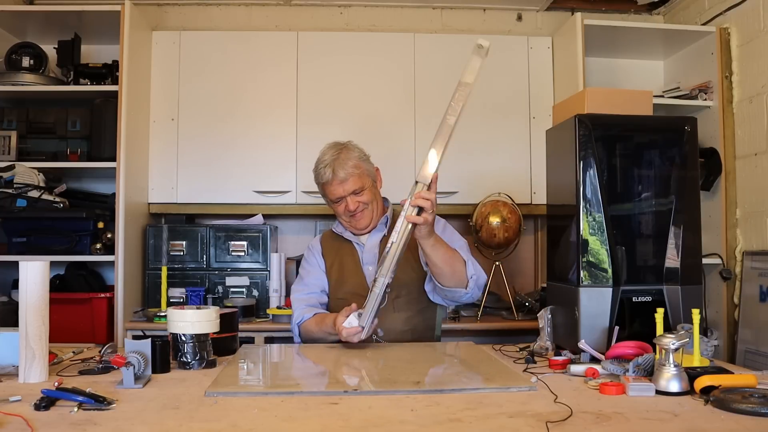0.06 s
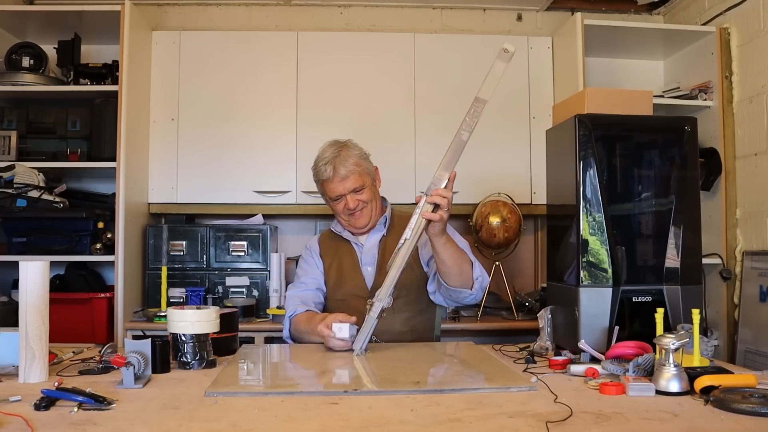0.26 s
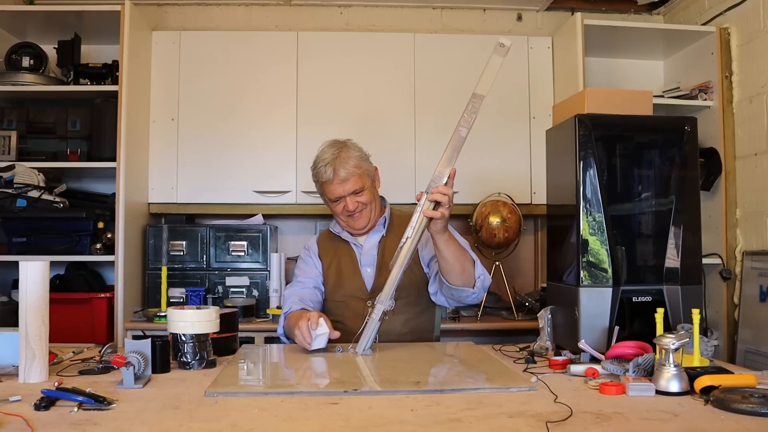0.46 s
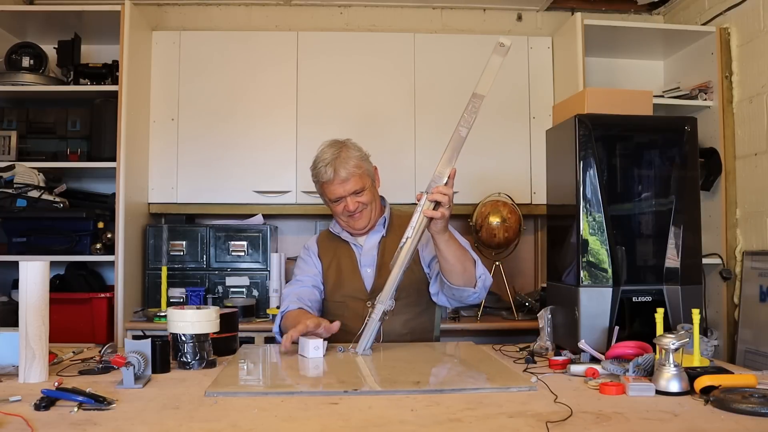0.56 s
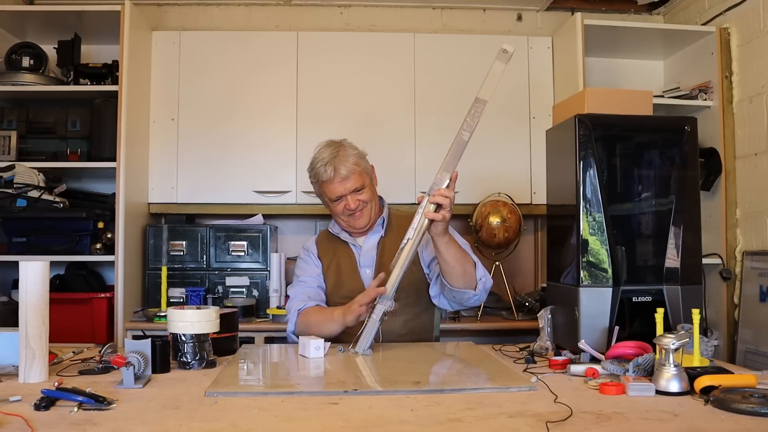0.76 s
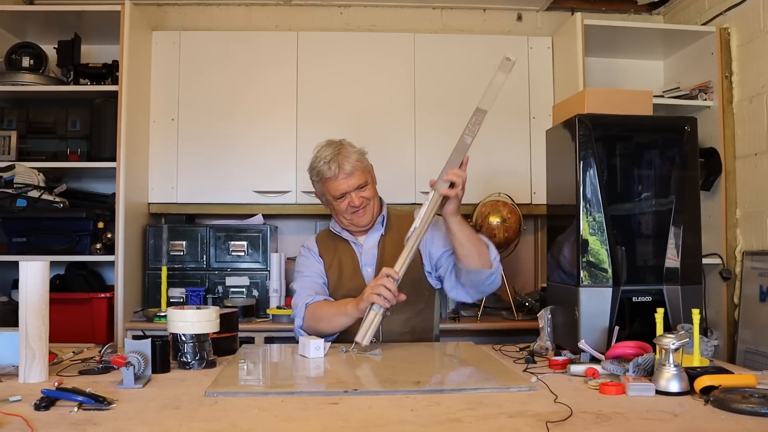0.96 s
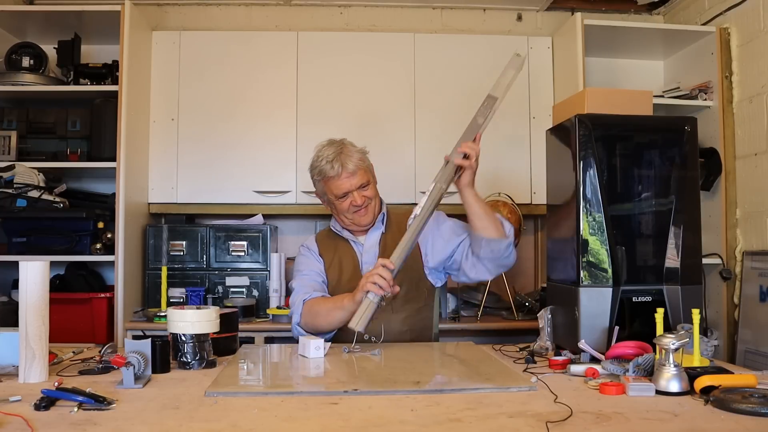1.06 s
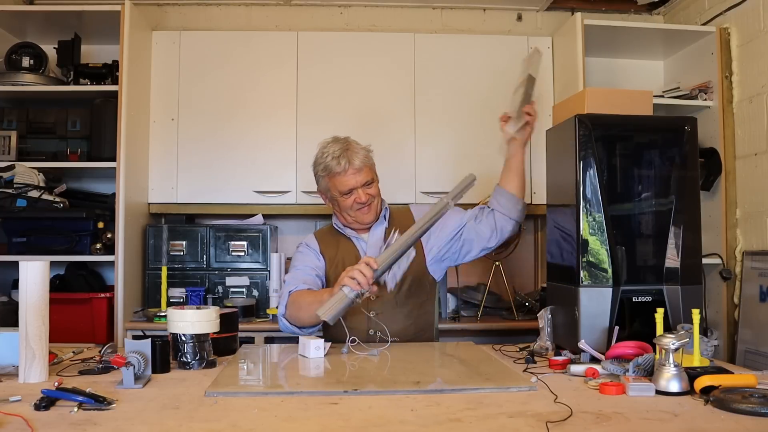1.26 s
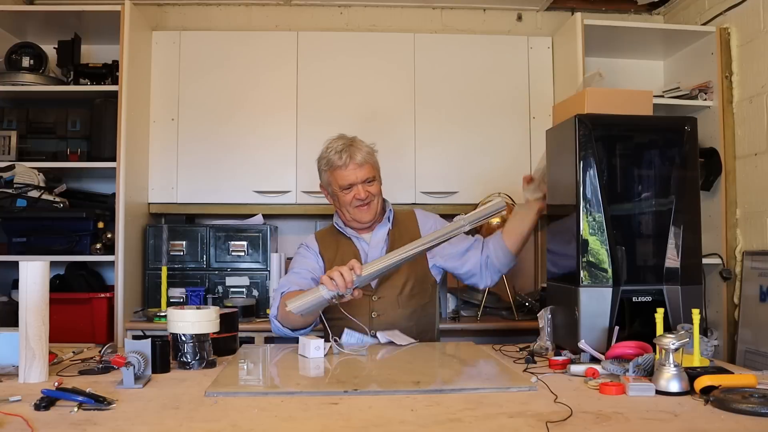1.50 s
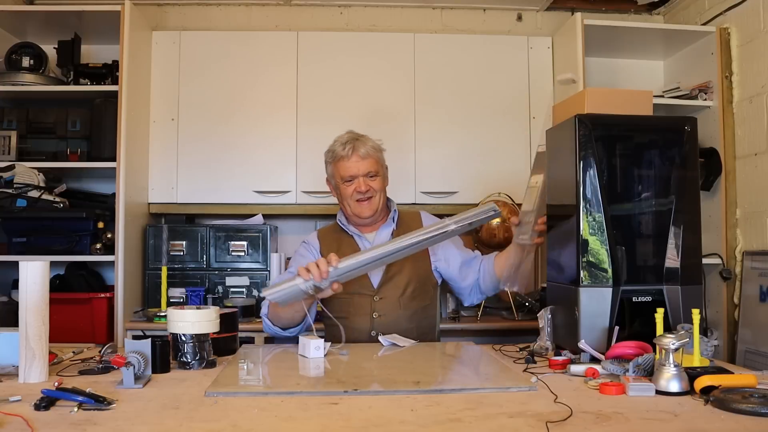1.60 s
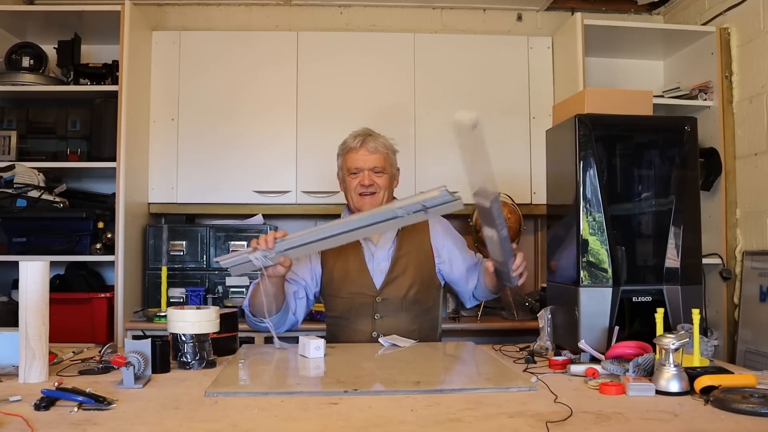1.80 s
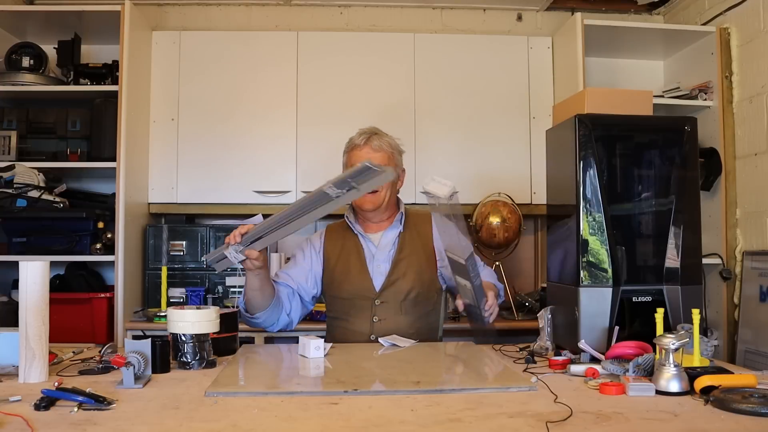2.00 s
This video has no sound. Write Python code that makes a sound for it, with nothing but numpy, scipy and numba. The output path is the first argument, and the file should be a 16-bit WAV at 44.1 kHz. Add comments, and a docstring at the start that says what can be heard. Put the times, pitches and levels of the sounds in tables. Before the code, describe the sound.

Plastic slats clatter over a workbench: a sharp clack with a bright metallic ting at 0 s, then dense clicks and rustling from 0.3 to 0.8 s, with a box thudding down near 0.5 and a brief sliding hum. A lull follows. Hollow knocks and a short scrape come at 1.05-1.3 s, a loud cabinet knock at 1.53, then light rattles and soft bumps until 2 s. Small hard room, peaks clipped.

```python
"""Plastic blind slats, handled as a bundle over a workbench, clack in quick volleys of short ringing contacts.
The place is a small hard-walled workshop with a short noise tail; a faint noise bed is its quiet air.
Many tiny grains make the bundle rustle, damped modes its hollow knocks, the thuds on bench and cabinet
and the tings of a small metal fitting that faces the microphone. Random slips drive resonances where one
slat slides on the bench and one scrapes out along its neighbour. The microphone clips on the loudest peaks."""
import sys
import numpy as np
from scipy import signal
from scipy.fft import rfft, irfft
from scipy.io import wavfile
from numba import njit

SR = 44100
rng = np.random.default_rng(int(sys.argv[2]) if len(sys.argv) > 2 else 0)


def wav_out(sig):
    """Save sig, one row per channel (or a flat mono array), as 16-bit PCM at SR to the path in sys.argv[1]."""
    wavfile.write(sys.argv[1], SR, np.round(np.clip(np.atleast_2d(sig).T, -1, 1) * 32767).astype(np.int16))


def level_to_linear(level):
    """Convert decibel levels to linear amplitude factors, elementwise."""
    exponent = np.asarray(level, float) / 20
    return 10 ** exponent


N = 90272  # samples

# Slats clacking. Each row: start in seconds, relative level in dB, centre pitch in Hz,
# time scale of the volley in seconds, relative level of the bright ticks in dB.
CLACK_VOLLEYS = [(0,0.5,2470,0.0035,-15), (.012,-8.5,2860,0.011,-19), (0.0927,-13.5,3900,0.0018,-18),
                 (0.238,-32,1720,0.0032,-53), (0.26,-19,2230,0.0025,-31), (0.3024,-14,2540,0.0051,-19),
                 (0.3191,-1.5,4070,.001,-27), (0.4054,-4.5,2270,0.015,-32), (0.4345,-28,5960,0.004,2),
                 (0.4395,-24.5,7000,0.0022,17.5), (0.448,-15,6600,0.005,-2), (0.4883,-3,2780,0.0036,-8),
                 (0.4953,-6,5030,0.0038,-28), (.5245,-16.5,6040,0.0087,6), (0.5306,-24,7650,0.0031,0),
                 (0.6274,-9,1650,0.0078,-2), (0.6531,-19,1550,0.0021,-22), (0.7048,-9,4770,0.0075,-18),
                 (0.7808,-8.5,2330,.006,-23), (1.0644,-15,3400,0.0077,-15), (1.2378,-19,1400,0.0018,9.5),
                 (1.2771,-7,1340,.002,1.5), (1.294,-14,1540,0.0064,3), (1.378,-19,2460,0.0048,6),
                 (1.5328,1,3640,.002,-36), (1.544,-4,2690,0.0027,-6), (1.7119,-22,2980,.005,-20),
                 (1.728,-21,5700,0.00092,-13), (1.74,-20.5,3900,0.002,-9), (1.9212,-15,4200,.0012,-30), ]
CONTACTS = 24  # per volley
CONTACT_CYCLES, CONTACT_SPREAD = 12, .24  # cycles per t60, pitch spread in log units
CONTACT_DB, TICK_DB = -8, -6

# Strikes on the metal fitting. Each row: start in seconds, relative level in dB, extra level of all modes
# but the two lowest in dB.
TING_BLOWS = [(0,-17.5,2), (.03,-33,-1), (.0925,-13.5,-18), (.6,-41,4.5), (.632,-35,0), (.7495,-26,0),
              (.761,-26,-2), (.772,-22.5,1), (.781,-24.5,-1), (.789,-25,-1), (.803,-25,-4), (.82,-29,-4),
              (1.134,-34,-13), (1.146,-24.5,-12)]
# Modes of the fitting. Each row: pitch in Hz, level in dB, t60 in seconds.
FITTING_MODES = [(5130,-5,.03), (5200,-4,.035), (8250,-8,.03), (8520,-5,.035), (10000,-10,.03),
                 (10180,-10,.025), (12880,-14,.03)]

# Rustle of the bundle. Each row: time in seconds, then relative levels in dB for low, middle, high and
# top grains.
RUSTLE_LEVELS = [(0,-24,-31.5,-14.5,-28.5), (.16,-47.5,-41,-57.5,-74), (.31,-31,-30.5,-39.5,-42.5),
                 (0.386,-46,-35.5,-40.5,-33), (0.413,-20.5,-20.5,-21.5,-40.5), (0.452,-31.5,-25,-25,-23.5),
                 (.485,-68,-26,-41,-45), (.54,-20,-27,-30,-31), (.58,-39,-37,-47,-46),
                 (0.629,-43,-29.5,-31,-43), (0.688,-40,-33,-50,-72), (0.713,-24,-17,-27.5,-30),
                 (0.738,-44,-24.5,-31,-40), (0.784,-19.5,-25.5,-25,-28), (0.829,-36.5,-29,-33,-75),
                 (.88,-41.5,-35,-65,-88), (.99,-41,-69,-76,-103), (1.024,-30.5,-37,-55,-49),
                 (1.078,-44,-31.5,-38.5,-43), (1.11,-67,-40.5,-36.5,-34), (1.19,-36,-33.5,-35,-29.5),
                 (1.26,-45,-29,-40,-49), (1.299,-23.5,-22,-30,-38), (1.359,-28,-35,-40.5,-55),
                 (1.521,-39.5,-45.5,-53.5,-66), (1.56,-28,-27,-41,-33), (1.699,-43,-55,-70,-58.5),
                 (1.718,-29.5,-38,-37.5,-44), (1.772,-50,-41,-40.5,-50), (1.821,-19.5,-29,-29.5,-35.5),
                 (1.851,-32,-37,-36.5,-59), (1.888,-43,-36.5,-53,-34.5), (1.965,-39,-37,-44,-60),
                 (1.994,-24.5,-36,-29,-32.5), (2.047,-36,-36.5,-39.5,-50)]
# Centre pitches of those four level columns: one value each, in Hz.
RUSTLE_CENTRES_HZ = [330, 1300, 5500, 11500]
# Modes of the slats that ring within the rustle. Each row: pitch in Hz, relative level in dB.
SLAT_MODES = [(1240, -18.5), (1360, -3.5), (1735, 2.5), (1890, -7), (2650, -0.5), (3200, -14), (3800, 1),
              (4700, -4.5), (5150, -11.5), (6500, -1), (7300, 0), (8450, -11)]
SLAT_SHARE, SLAT_CYCLES = .2, 35  # share of grains that ring a slat mode, their cycles per t60
GRAINS_PER_S, GRAIN_CYCLES, GRAIN_RISE = 14000, 9.2, 0.13  # rise as a share of t60
GRAIN_SPREAD_DB, RUSTLE_FLICKER_DB, RUSTLE_DB = 2.2, 1.5, -3

# Decay of the workshop. Each row: band centre in Hz, t60 in seconds.
ROOM_DECAY = [(150, 0.11), (600, 0.29), (2000, 0.18), (5000, 0.093), (11000, 0.51)]
ROOM_DB, ROOM_GAP_S = -7, 0.0013  # tail energy, silence ahead of the tail

# Spectrum of the quiet air. Each row: frequency in Hz, relative density in dB per Hz.
AIR_SPECTRUM = [(20, -9.5), (45, -13.5), (90, -6), (200, -16.5), (900, -18), (3000, -40), (15500, -46)]
AIR_DB = -55.5  # rms

# Hollow knocks inside the bundle. Each row: start in seconds, relative level in dB, factor on the modes' pitch.
KNOCK_BLOWS = [(0.332,-23.5,1.08), (0.7146,-20,0.93), (1.0648,-22,0.99), (1.072,-24,0.65),
               (1.1171,-23,1.01), (1.151,-19,1), (1.1604,-16,0.91), (1.238,-16.5,.9), (1.277,-14.5,1.39),
               (1.294,-20.5,.8), (1.313,-20,0.87)]
# Modes of the bundle's hollow body. Each row: pitch in Hz before that factor, level in dB, t60 in seconds.
BODY_MODES = [(552,-5,0.055), (690,-2.5,0.033), (798,7,0.052), (908,3,0.062), (1080,-19,0.018)]

# A small box is set down on the bench, the bundle's end follows. Each row: start in seconds,
# relative level in dB, tilt in dB per octave.
BENCH_BLOWS = [(.388,-21.5,7.5), (.4862,-2,3.5), (.4965,-4,5.5), (.706,-36.5,13), (.775,-21,5.5),
               (1.293,-35,0)]
# Modes of the bench. Each row: pitch in Hz, level in dB, t60 in seconds.
BENCH_MODES = [(59.5, 4, 0.13), (134, 4, 0.1), (299, -4, 0.0535), (451, 0, 0.046), (524, 1.5, 0.028),
               (618, -1, 0.035), (730, -6, 0.074), (933, -3.5, 0.023)]
# The loose slat swings against the cabinet. Each row: start in seconds, relative level in dB,
# tilt in dB per octave.
CABINET_BLOWS = [(1.533, -3, 5), (1.545, -3.5, 0.5), (1.755, -26, 9), (1.812, -19, -7),
                 (1.825, -35.5, 16.5), (1.978, -29, -18), (1.992, -37, -17)]
# Modes of the cabinet. Each row: pitch in Hz, level in dB, t60 in seconds.
CABINET_MODES = [(111, -14, 0.13), (126.7, -9, 0.24), (158, -14, 0.061), (226.4, -1.5, 0.084),
                 (280, -3.5, 0.061), (341, -9, 0.11), (435.6, -2.5, 0.074), (590, -17.5, 0.048),
                 (683, -13.5, 0.078), (896, -21.5, 0.045)]
THUD_DB, THUD_RISE_S = -9.5, 0.0012

# A slat hums as it slides on the bench. Each row: time in seconds, relative level in dB.
SLIDE_LEVELS = [(0.59, -19.5), (0.628, -23.5), (0.79, -18.5), (0.86, -30.5)]
SLIDE_HZ, SLIDE_WIDTH_HZ, SLIDE_DB = 1225, 160, -12

# A slat scrapes out. Each row: time in seconds, pitch of the high ring in Hz, high level in dB, low level in dB.
SCRAPE_PATH = [(1.165, 2060, -52, -34.5), (1.201, 2054, -22, -22), (1.245, 2070, -36, -22)]
SCRAPE_LOW_HZ, SCRAPE_HIGH_WIDTH_HZ, SCRAPE_LOW_WIDTH_HZ = 880, 165, 300
SCRAPE_SLIPS_PER_S = 1500

# Colour of the microphone. Each row: frequency in Hz, gain in dB.
MIC_COLOUR = [(1000, 4), (4000, 4), (8300, 10.5), (9300, 3.5), (12000, -1.5), (15500, 2)]
CLIP, TOP_HZ = 0.93, 15800  # clipping amplitude, upper band limit


def colour(x, points):
    """Shapes the spectrum by (Hz, dB) points, joined along log frequency."""
    hz, db = np.array(points, float).T
    f = np.maximum(np.fft.rfftfreq(len(x), 1 / SR), 1)
    gain = level_to_linear(np.interp(np.log(f), np.log(hz), db))
    return irfft(rfft(x) * gain, len(x))


def band(x, hz, width_hz):
    """Two-pole resonance."""
    return signal.lfilter(*signal.iirpeak(hz, hz / width_hz, SR), x)


def highpass(x, hz):
    """Second-order roll-off of the bass."""
    return signal.lfilter(*signal.butter(2, hz, "high", fs=SR), x)


def unit(x):
    """Scales to rms 1."""
    return x / np.sqrt(np.mean(x ** 2))


def curve(rows, col, off=-90):
    """One column over time; off outside its span."""
    rows = np.array(rows, float)
    return np.interp(np.arange(N) / SR, rows[:, 0], rows[:, col], off, off)


@njit
def ring(start, hz, t60, size, rise, length):
    """Sum of damped sines, each with an exponential rise in seconds and cut off after its t60."""
    out = np.zeros(length)
    for k in range(len(start)):
        turn, z = np.exp((2j * np.pi * hz[k] - 6.908 / t60[k]) / SR), size[k] + 0j
        fade, unrisen = np.exp(-1 / (rise[k] * SR)), 1.
        for i in range(int(start[k] * SR), min(length, int((start[k] + t60[k]) * SR))):
            out[i] += z.imag * (1 - unrisen)
            z, unrisen = z * turn, unrisen * fade
    return out


def strike(s, db, modes, detune=0.019, rise_s=0.000075):
    """Every blow (db: blows x modes) rings all modes, each time with slightly other levels and pitches."""
    hz, mode_db, t60 = np.array(modes, float).T
    chance = rng.standard_normal((len(s), 2, len(hz)))
    size = level_to_linear(db + mode_db + 2 * chance[:, 0]).ravel()
    pitch = (hz * (1 + detune * chance[:, 1])).ravel()
    return ring(np.repeat(s, len(hz)), pitch, np.tile(t60, len(s)), size, rise_s + 0 * size, N)


def clacks():
    """Each clack is a volley of weakening contacts around its pitch; every third is a short bright tick."""
    s, db, hz, volley_s, tick_db = np.array(CLACK_VOLLEYS, float).T[:, :, None]
    u = rng.random((len(s), CONTACTS))
    pitch_chance, level_chance = rng.standard_normal((2, len(s), CONTACTS))
    late = -np.log(1 - u) * (np.arange(CONTACTS) > 1)  # the first two contacts come at once
    bright = np.arange(CONTACTS) % 3 == 1
    tick_hz = 10500 * np.exp(CONTACT_SPREAD * pitch_chance)
    # later contacts stray further in pitch
    contact_hz = hz * np.exp(CONTACT_SPREAD * np.minimum(late + .5, 1.5) * pitch_chance)
    f = np.clip(np.where(bright, tick_hz, contact_hz), 300, 15500).ravel()
    kind_db = np.where(bright, tick_db + TICK_DB, CONTACT_DB)
    size = level_to_linear(db + kind_db + 1.5 * level_chance - 3 * late).ravel()
    start = (s + late * np.where(bright, .4, 1) * volley_s).ravel()
    return ring(start, f, CONTACT_CYCLES / f, size, 0.1 / f, N)


def tings():
    """A blow rings the fitting's few high modes, most of them in close pairs."""
    s, db, upper_db = np.array(TING_BLOWS, float).T[:, :, None]
    is_upper = np.arange(len(FITTING_MODES)) > 1
    return strike(s[:, 0], db + upper_db * is_upper, FITTING_MODES, .006)


def rustle():
    """Thousands of tiny soft contacts; some ring a slat mode, the others a brief chance pitch."""
    when, pitch, kind, strength = rng.random((int(GRAINS_PER_S * N / SR), 4)).T
    s = when * N / SR
    slat_hz, slat_db = np.array(SLAT_MODES, float).T
    pick = (pitch * len(SLAT_MODES)).astype(int)
    held = kind < SLAT_SHARE
    held_hz = slat_hz[pick] * (1 + 0.013 * (kind / SLAT_SHARE - .5))
    hz = np.where(held, held_hz, 190 * 82 ** (pitch ** 0.574))
    t60 = np.where(held, SLAT_CYCLES, GRAIN_CYCLES) / hz

    # level at each grain's moment, blended between the two nearest columns
    rows = np.array(RUSTLE_LEVELS, float)
    levels = np.array([np.interp(s, rows[:, 0], c) for c in rows[:, 1:].T])
    columns = np.arange(len(RUSTLE_CENTRES_HZ))
    place = np.interp(np.log(hz), np.log(RUSTLE_CENTRES_HZ), columns)
    weight = np.maximum(1 - np.abs(place - columns[:, None]), 0)

    # the level flickers in steps of 400 samples
    flicker = np.repeat(rng.standard_normal(N // 400 + 1), 400)[(s * SR).astype(int)]
    db = (weight * levels).sum(0) + held * slat_db[pick]
    db = db - GRAIN_SPREAD_DB * 1.2 * np.log(1 - .97 * strength)
    db = db + RUSTLE_FLICKER_DB * np.clip(flicker, -2, 2)
    size = level_to_linear(db + RUSTLE_DB) / np.sqrt(t60 * 100)  # long grains start weaker
    return ring(s, hz, t60, size, GRAIN_RISE * t60, N)


def room(x):
    """Diffuse tail of the hard walls: noise bands, each with its own decay."""
    t = np.arange(SR // 2) / SR
    tail = 0
    for hz, t60 in ROOM_DECAY:
        tail = tail + band(rng.standard_normal(len(t)), hz, 1.02 * hz) * 1000 ** (-t / t60)
    tail = tail * np.clip(t / ROOM_GAP_S - 1, 0, 1)
    return signal.fftconvolve(x, tail / np.sqrt(np.sum(tail ** 2)))[:N] * level_to_linear(ROOM_DB)


def air():
    """Steady noise of the quiet workshop, mostly bass."""
    return unit(colour(rng.standard_normal(N), AIR_SPECTRUM)) * level_to_linear(AIR_DB)


def knocks():
    """The hollow body of the bundle, higher or lower with the spot that is hit."""
    out = 0
    for s, db, factor in KNOCK_BLOWS:
        out = out + strike(np.array([s]), db - 10.5, np.array(BODY_MODES) * [factor, 1, 1], 0.036)
    return out


def thuds(blows, modes):
    """Wooden modes with a soft onset; each blow tilts their levels about 250 Hz."""
    s, db, tilt = np.array(blows, float).T[:, :, None]
    octaves = np.log2(np.array(modes)[:, 0] / 250)
    return strike(s[:, 0], db + THUD_DB + tilt * octaves, modes, .01, THUD_RISE_S)


def slips(rate):
    """Stick-slip: uneven clicks at random moments, rate per second on average."""
    u = rng.random((2, N))
    return (u[0] < rate / SR) * (u[1] - .3)


def slide():
    """Slips against the bench ring one slat mode."""
    hum = unit(band(slips(700), SLIDE_HZ, SLIDE_WIDTH_HZ))
    return hum * level_to_linear(curve(SLIDE_LEVELS, 1) + SLIDE_DB)


def scrape():
    """Slips along the neighbouring slat ring a slightly gliding high resonance and a broad low one."""
    pulses, hz = slips(SCRAPE_SLIPS_PER_S), curve(SCRAPE_PATH, 1, 2260)
    carrier = np.exp(2j * np.pi * np.cumsum(hz) / SR)
    # shifted to zero, low-passed and shifted back: a resonance that follows the pitch
    lowpass = signal.butter(2, SCRAPE_HIGH_WIDTH_HZ / 2, fs=SR)
    slow = signal.lfilter(*lowpass, pulses * np.conj(carrier))
    high = unit((slow * carrier).real)
    low = unit(band(band(pulses, SCRAPE_LOW_HZ, SCRAPE_LOW_WIDTH_HZ), SCRAPE_LOW_HZ, 840))
    return high * level_to_linear(curve(SCRAPE_PATH, 2)) + low * level_to_linear(curve(SCRAPE_PATH, 3))


def scene():
    """All sources, their room and the quiet air."""
    ting = tings()
    slats = highpass(clacks() + knocks(), 350.)  # thin plastic
    wood = thuds(BENCH_BLOWS, BENCH_MODES) + thuds(CABINET_BLOWS, CABINET_MODES)
    handled = slats + wood + rustle() + scrape() + slide()
    handled = highpass(handled, 95.)  # the handled sounds roll off below about 95 Hz
    # the fitting faces the microphone: less of it reaches the walls
    tail = room(handled + level_to_linear(-10) * ting)
    return (handled + ting + tail + air())[None]


def top_cut(x):
    """Nothing passes above the cut-off."""
    return signal.sosfilt(signal.butter(12, 15700, fs=SR, output="sos"), x)


def record(dry):
    """Microphone colour, clipping of the loudest peaks, then a steep upper band limit."""
    x = colour(dry[0], MIC_COLOUR)
    x = np.clip(x[None], -CLIP, CLIP)
    x = signal.sosfilt(signal.ellip(8, .2, 60, TOP_HZ, fs=SR, output="sos"), x)
    return top_cut(x)


dry = scene()
out = record(dry)
wav_out(out)
```